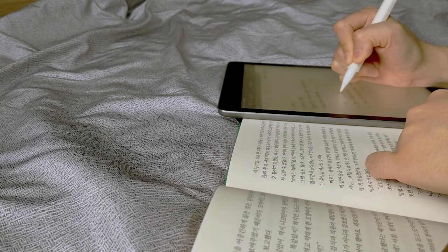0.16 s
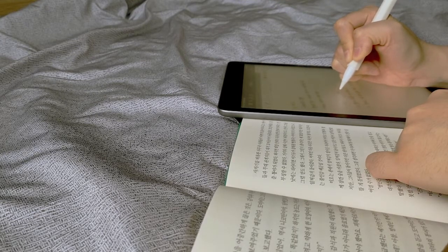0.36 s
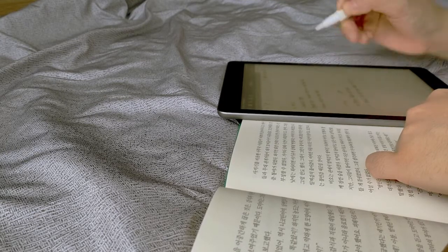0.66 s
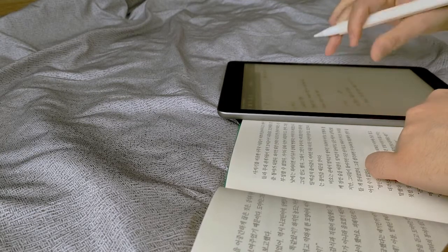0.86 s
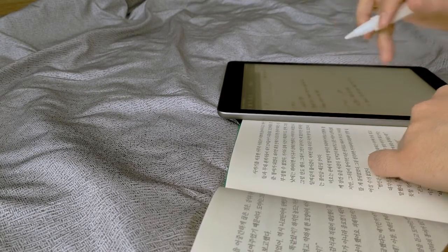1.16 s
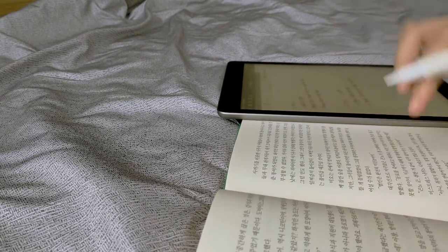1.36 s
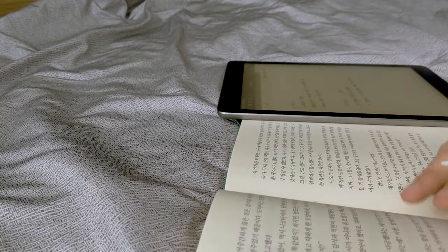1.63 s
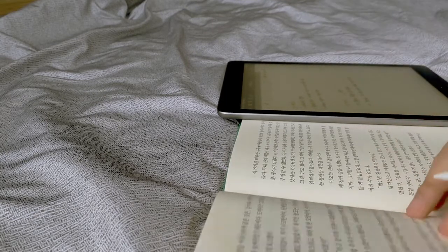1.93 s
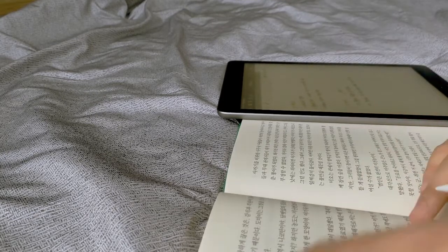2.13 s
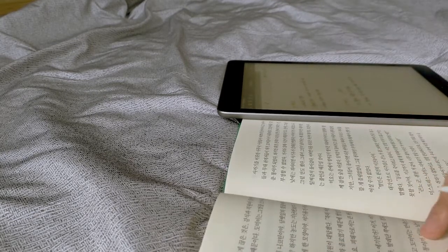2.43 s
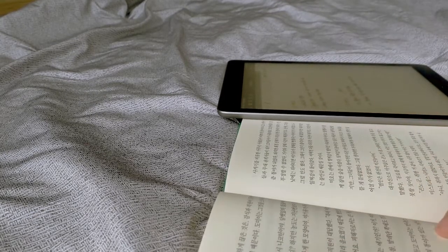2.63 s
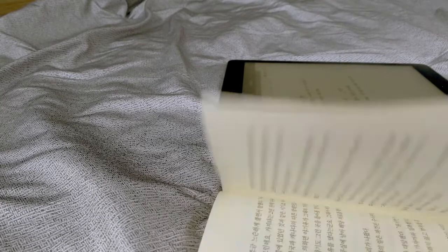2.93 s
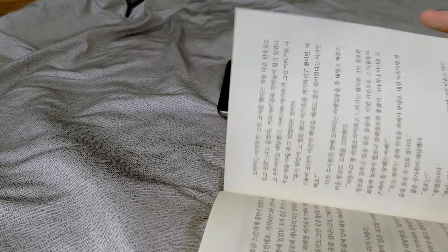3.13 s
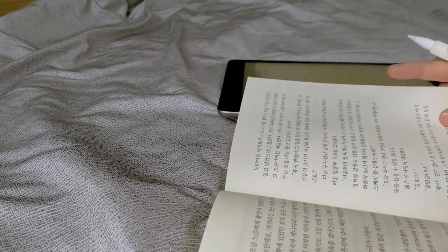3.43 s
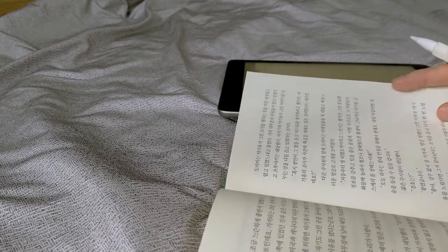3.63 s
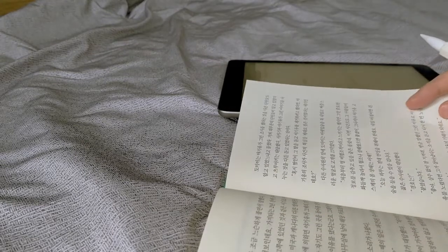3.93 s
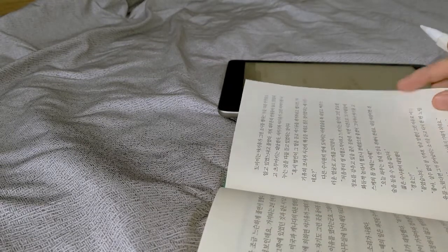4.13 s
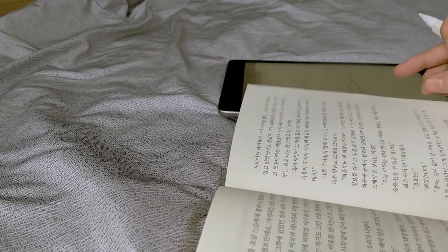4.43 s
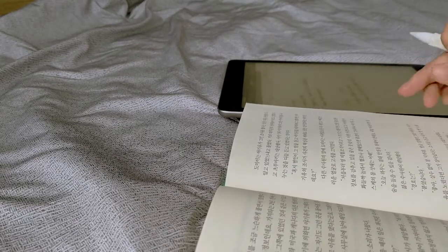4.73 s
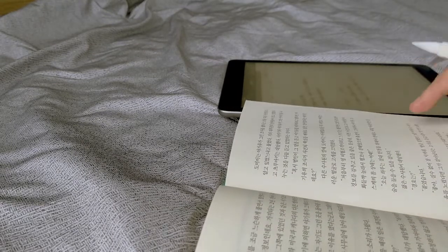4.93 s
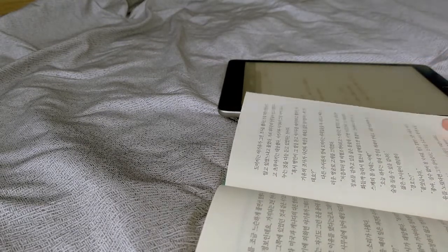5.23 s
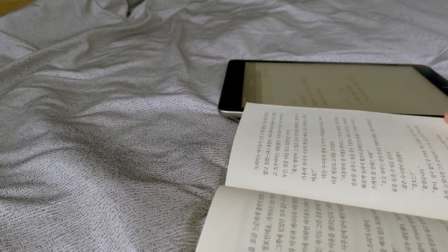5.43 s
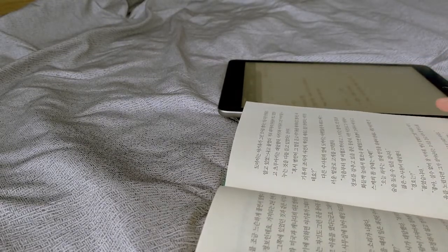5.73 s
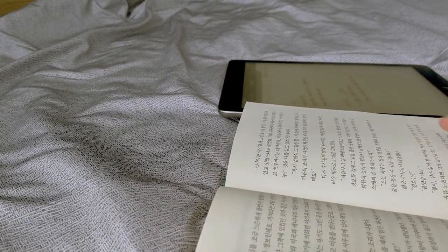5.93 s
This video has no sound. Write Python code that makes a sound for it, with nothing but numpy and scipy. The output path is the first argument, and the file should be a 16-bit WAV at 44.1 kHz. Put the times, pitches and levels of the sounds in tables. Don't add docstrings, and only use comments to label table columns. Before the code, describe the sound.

Three small hard ticks on glass open the scene, the last softer, over faint room hiss. Hands shift on fabric; paper slides quietly, then crinkles and snaps as a sheet is turned, with deep soft thuds through the mattress. A bright snap and a loud slap on glass follow, then dry scrapes, small cracks and gentle stroking. Close phone-like microphone in a small, soft, dry room.

```python
import sys
import numpy as np
from scipy import signal
from scipy.fft import rfft, irfft, next_fast_len
from scipy.io import wavfile
from scipy.ndimage import uniform_filter1d, map_coordinates

SR = 44100
rng = np.random.default_rng(int(sys.argv[2]) if len(sys.argv) > 2 else 0)


def to_wav(sig):
    pcm = np.clip(np.atleast_2d(sig), -1, 1) * 32767
    pcm = np.round(pcm).astype(np.int16)
    wavfile.write(sys.argv[1], SR, pcm.T)


def attenuation_scalar(level_db):
    decades = np.asarray(level_db, float) / 20
    return 10 ** decades


N = 268128


def unit(x):
    return x / np.sqrt(np.mean(x ** 2) + 1e-20)


def along(points, hz):
    f, v = np.transpose(points)
    return np.interp(np.log(hz + 1), np.log(f + 1), v)


def curve(rows):
    s, value = np.transpose(rows)
    return np.interp(np.arange(N) / SR, s, value)


def drift(rate_hz):
    knots = rng.standard_normal(int(N * 200 / SR) + 4)
    return map_coordinates(knots, [np.arange(N) * rate_hz / SR])


def filtered(x, response):
    m = next_fast_len(len(x) + 8192)
    return irfft(rfft(x, m) * response(np.fft.rfftfreq(m, 1 / SR)), m)[:len(x)]


def resonance(f, hz, width_hz):
    return 1j * f * width_hz / (hz * hz - f * f + 1j * f * width_hz)


def dull(f, hz):
    return (hz * hz / (hz * hz - f * f + 1j * f * hz * 1.7)) ** 2


def grainy(spectrum, grain_db, rate_hz, patchy_db):
    z = signal.stft(rng.standard_normal(N + 512), nperseg=512)[2]
    patches = uniform_filter1d(rng.standard_normal(z.shape), size=9, axis=0)
    patches = unit(uniform_filter1d(patches, size=7, axis=1))
    noise = signal.istft(z * attenuation_scalar(patchy_db * patches), nperseg=512)[1][:N]
    noise = noise * attenuation_scalar(grain_db * drift(rate_hz))
    return unit(filtered(noise, lambda f: attenuation_scalar(along(spectrum, f))))


def swells(rest_db, rows):
    ms = np.arange(0, N * 1000 / SR + 1)
    power = 0
    for s, db, rise_ms, fall_ms in rows:
        away = np.maximum((1000 * s - ms) / rise_ms, (ms - 1000 * s) / fall_ms)
        power = power + attenuation_scalar(db - 10 * away) ** 2
    return np.sqrt(attenuation_scalar(rest_db) ** 2 + np.interp(np.arange(N) * 1000 / SR, ms, power))


def crack(t, hz, ms):
    return np.sign(ms) * np.exp(-1.2 * np.abs(t * 1000 / ms) ** 1.25) * np.cos(2 * np.pi * hz * t)


def add(track, s, sound):
    track[round(s * SR):][:len(sound)] += sound


# start_s, tick_db, push_db, ring_db
TAPS = [
    (0.2355, -26.5, -8, -7),
    (0.493, -28.5, -6.5, -6.5),
    (0.826, -34, -6.5, -5),
]
# after_landing_ms, level_db, pitch_hz, half_length_ms (negative: swings away)
CONTACTS = [
    (.6, -6, 3300, .3),
    (1.47, -4, 2900, -.3),
    (1.45, -8, 1300, -.4),
    (1.95, -11, 3400, .45),
]
# pitch_hz, level_db, t60_s
GLASS = [(274, 6.5, 0.013), (710, 0.5, 0.026), (1466, -14, 0.1), (1600, -31, 0.06), (1050, -12, 0.018),
         (2430, -20, .04), (3100, -24, .03)]


def stylus():
    out, t = np.zeros(N + SR), np.arange(SR // 8) / SR
    for s, db, push_db, ring_db in TAPS:
        chatter = rng.standard_normal(len(t)) * (t < 0.0024)
        tick = attenuation_scalar(-12) * filtered(chatter, lambda f: resonance(f, 3250, 1500) * dull(f, 4800))
        for after_ms, level_db, hz, ms in CONTACTS:
            tick = tick + attenuation_scalar(level_db) * crack(t - after_ms / 1000, hz, ms)
        tick = attenuation_scalar(db) * tick
        rebound = filtered(tick, lambda f: resonance(f, 2000, 1600) * dull(f, 3600))
        add(out, s, tick)
        add(out, s + 0.0085, attenuation_scalar(-7) * rebound)
        onset = 1 - np.exp(-(t / 0.00062) ** 2)
        modes = [attenuation_scalar(level_db - 60 * t / t60_s) * onset * np.sin(2 * np.pi * hz * t)
                 for hz, level_db, t60_s in GLASS]
        add(out, s + 0.00242, attenuation_scalar(db + push_db + 9.5) * modes[0])
        add(out, s + 0.0029, attenuation_scalar(db + ring_db) * sum(modes[1:]))
    return out[:N]


# start_s, level_db, click_hz, thud_db, thud_hz
SLAP = [
    (3.7102, -2, 1800, -16.5, 85.5),
]


def slap():
    out, t = np.zeros(N + SR), np.arange(SR // 4) / SR
    for s, db, click_hz, thud_db, thud_hz in SLAP:
        u = (t - 0.0006) * click_hz * np.pi
        click = -(1 - 2 * u * u) * np.exp(-u * u)
        push = attenuation_scalar(3.5 - 60 * t / 0.0047) * np.sin(2 * np.pi * 550 * (t - 0.0008)) * (t > 0.0008)
        noise = filtered(rng.standard_normal(len(t)), lambda f: resonance(f, 1500, 2300) ** 2)
        rattle = attenuation_scalar(-13.5 - 60 * t / 0.018) * (t > 0.001) * unit(noise)
        add(out, s, attenuation_scalar(db) * (click + push + rattle))
        add(out, s + 0.00427, attenuation_scalar(thud_db - 60 * t / 0.097) * np.sin(2 * np.pi * thud_hz * t))
    return out[:N]


# start_s, level_db, first_hz, last_hz, length_ms
FLICK = [
    (3.5592, -19, 2600, 4300, 3.5),
]


def flick():
    out, t = np.zeros(N + SR), np.arange(SR // 50) / SR
    rasp = lambda f: resonance(f, 6200, 1900) ** 2 + resonance(f, 1400, 900)
    for s, db, first_hz, last_hz, ms in FLICK:
        u = t * 1000 / ms
        turns = np.cumsum(first_hz + (last_hz - first_hz) * np.minimum(u, 1) ** 0.66) / SR
        grit = attenuation_scalar(3) * filtered(rng.standard_normal(len(t)), rasp)
        add(out, s, attenuation_scalar(db) * u ** 0.8 * np.exp(-u ** 9) * (np.sin(2 * np.pi * turns) + grit))
    return out[:N]


# middle_s, peak_db, pitch_hz, half_length_ms (negative: the sheet snaps away)
CRACKS = [(1.9935, -38, 9000, .06), (2.025, -46, 13500, .5), (2.0378, -38, 4200, .2), (2.46, -44, 3500, .4),
          (2.7185, -31, 2950, 1.5), (2.773, -38, 2200, 1.5), (3.2245, -26, 3950, .6),
          (3.5607, -10, 3100, .7), (3.5622, -5.5, 4250, .8), (3.5625, -22, 1350, 1.5),
          (3.5662, -23, 1350, 1.3), (3.5712, -25, 3400, 1), (3.7505, -22, 2200, -1.2),
          (3.7557, -20, 1700, -.8), (3.7685, -23, 4100, 1.2), (3.8073, -19, 2100, -.6),
          (3.8081, -22, 4000, .2), (3.8091, -11.5, 2500, .5), (3.8107, -15, 2700, -.4),
          (3.8122, -21, 3100, .6), (3.8117, -15, 1700, -.4), (3.8137, -17, 2200, .4),
          (3.8149, -21, 2300, -.4), (3.8165, -22, 1500, .8), (3.8395, -30, 2100, 1),
          (3.9155, -33, 1700, 1.2), (3.9195, -33, 3000, 1.2), (4.0914, -25, 1850, -.9),
          (4.0925, -35, 3250, 1.2), (4.0952, -28, 1250, 1), (4.0978, -30, 1500, -.6),
          (4.1022, -32, 1950, -.8), (4.1048, -28, 1050, .9), (4.1182, -31, 1600, -.8),
          (4.1195, -38, 3400, .8), (4.1218, -28, 1350, -1.2), (4.123, -33, 2000, -.7),
          (4.4855, -24, 2200, .4), (4.4878, -24, 2800, .4)]
# middle_s, peak_db, pitch_hz, half_length_ms (sign as above)
KNOCKS = [(2.7325, -31, 420, -1.5), (2.7465, -33, 330, 2), (2.7655, -34, 330, 2), (3.158, -33, 600, 1),
          (3.184, -34, 500, 1), (3.2262, -24, 480, 1.1), (3.577, -27, 330, 1.5), (3.5802, -26, 380, 1.2),
          (3.5828, -23, 150, -2.5), (3.8417, -29, 250, -2), (3.8838, -31, 400, -1.2),
          (4.0938, -31, 330, -2), (4.0985, -35, 200, -2.5), (4.103, -35, 300, -1.5),
          (4.1297, -36, 300, 1.5), (5.011, -36, 700, 1.2), (5.6295, -42, 1150, 3), (5.619, -31, 190, 2),
          (5.6505, -30, 270, 2), (5.658, -35, 300, -1.5), (5.666, -35, 300, -1.5), (5.6797, -34, 310, 2),
          (5.6815, -35, 150, -2.5), (5.69, -37, 350, -1.5)]


def creases():
    out, t = np.zeros(N + SR), np.arange(SR // 50) / SR
    for s, db, hz, ms in CRACKS + KNOCKS:
        add(out, s - 0.01, attenuation_scalar(db) * crack(t - 0.01, hz, ms))
    return out[:N]


# freq_hz, level_db_per_hz
FIZZ = [(1500, 2.5), (4000, 1.5), (6500, 0.5), (9000, 2.5), (15500, -2)]


def paper(rows, rise, sharpness, grit_db, fizz_db):
    out, t = np.zeros(N + SR), np.arange(SR // 6) / SR
    for s, db, hz, ms, flap_db in rows:
        width_hz = hz / sharpness
        sheet = lambda f: (resonance(f, hz, width_hz) * resonance(f, hz, 2 * width_hz)
                           * dull(f, max(4800, 1.54 * hz)))
        u = t * 1000 / ms
        body, fizz, flap, grit = rng.standard_normal((4, len(t)))
        shape = np.clip(u / rise, 0, 1) * np.exp(-u ** 4)
        shape = shape * attenuation_scalar(grit_db * unit(uniform_filter1d(grit, size=90)))
        size = np.sqrt(np.mean(shape ** 2))
        body = unit(filtered(shape * body, sheet))
        fizz = unit(filtered(shape * fizz, lambda f: attenuation_scalar(along(FIZZ, f))))
        flap = unit(filtered(shape * flap, lambda f: resonance(f, 300, 910) ** 2))
        burst = body + attenuation_scalar(fizz_db) * fizz + attenuation_scalar(flap_db) * flap
        add(out, s - 0.0005, attenuation_scalar(db - 9.5) * size * burst)
    return out[:N]


# start_s, level_db, pitch_hz, length_ms, flap_db
SNAPS = [(2.457, -42, 1800, 6, -9), (2.685, -28.5, 2280, 3.4, -1), (2.718, -29, 3300, 5.3, -6),
         (2.769, -34, 2300, 9, 3), (2.807, -26, 2300, 2.7, -3), (2.8178, -28.5, 2290, 3.7, -6),
         (2.934, -28.5, 2500, 3.1, -2), (3.2237, -19.5, 2600, 2, -12), (4.4838, -21.5, 1900, 6.5, -9),
         (5.545, -40, 10000, 3.8, -30), (5.6165, -38, 7000, 3.2, -10), (5.6215, -32, 9000, 3.1, -6)]
# start_s, level_db, pitch_hz, length_ms, flap_db
SCUFFS = [(2.56, -35.5, 2100, 42, -16), (2.716, -30, 2800, 25, -7), (2.937, -32, 4200, 16, -20),
          (3.155, -48.5, 1970, 50, 13.5), (3.23, -50, 2538, 26, 6), (3.505, -28, 3740, 83, -34),
          (3.755, -23.5, 3180, 33, -2), (4.444, -45, 2000, 15, 11), (4.483, -33, 3100, 36, 7),
          (5.98, -34, 3150, 60, -4.5)]


def free_sheet():
    snaps = paper(SNAPS, rise=0.17, sharpness=0.95, grit_db=2.0, fizz_db=0.5)
    return snaps + paper(SCUFFS, rise=0.12, sharpness=1.5, grit_db=0.5, fizz_db=-6)


# start_s, level_db, pitch_hz, length_ms, flap_db
POPS = [(3.5605, -26, 2100, 7.5, -25), (3.5635, -25, 4200, 3.9, -25), (3.5705, -25, 3600, 3.5, -25),
        (3.8068, -24, 2000, 11, -31), (3.8105, -36, 3200, 4, -32), (3.839, -35, 1940, 8.1, -6),
        (4.0902, -34, 1790, 4, -5), (4.0905, -38, 3250, 6, -20), (4.1165, -33, 1660, 9, -4)]
# start_s, level_db, pitch_hz, length_ms, flap_db
DRAGS = [(3.575, -38, 3960, 69, -16), (3.62, -28.5, 3440, 66, -28), (3.714, -27.5, 2130, 89, -7),
         (3.749, -21, 1670, 15.5, -6.5), (3.815, -25, 1920, 11, -11.5), (3.905, -34, 1630, 30, -8),
         (4.011, -41, 1210, 58, -10.5), (4.093, -29, 1330, 13, -6.5), (4.106, -28, 1200, 22, -19),
         (4.126, -40, 1340, 60, -10), (4.51, -33, 1110, 77, -2), (5.2, -42, 1090, 66, -20),
         (5.27, -43, 1200, 100, -17), (5.607, -40, 13100, 9, -25), (5.621, -29.5, 15200, 23, -25),
         (5.665, -38, 14500, 59, -25)]


def sheet_on_glass():
    pops = paper(POPS, rise=0.094, sharpness=2.1, grit_db=7.5, fizz_db=-24)
    return pops + paper(DRAGS, rise=0.063, sharpness=1.85, grit_db=1.0, fizz_db=-28)


SQUEAK_HZ = 6720
# start_s, level_db, length_ms
SQUEAKS = [
    (3.625, -46, 59),
    (3.715, -38, 23),
    (3.742, -31, 6),
    (3.755, -33.5, 34),
    (3.83, -44, 37),
]


def squeaks():
    rows = [(s, db, SQUEAK_HZ, ms, -30) for s, db, ms in SQUEAKS]
    return paper(rows, rise=0.18, sharpness=13, grit_db=5.0, fizz_db=-30)


# time_s, level_db
SMOOTHING = [(4.29, -51), (4.47, -45.5), (4.545, -39.5), (4.6, -48), (4.65, -43), (4.836, -40), (4.93, -34),
             (4.96, -39), (5.09, -39), (5.16, -44)]
# pitch_hz, width_hz, level_db
POCKET = [(2010, 600, -1), (3010, 530, 3), (4200, 490, -13), (6400, 840, -11)]
TOUCH_S, LIFT_S = 0.017, 0.18


def smoothing():
    before = [(SMOOTHING[0][0] - TOUCH_S, -90)]
    after = [(SMOOTHING[-1][0] + LIFT_S, -90)]
    level_db = curve(before + SMOOTHING + after)
    friction = rng.standard_normal(N) * attenuation_scalar(0.78 * drift(110))
    modes = lambda f: sum(attenuation_scalar(db) * resonance(f, hz, width_hz) for hz, width_hz, db in POCKET)
    return attenuation_scalar(level_db) * unit(filtered(friction, lambda f: modes(f) * resonance(f, 2000, 4600)))


# time_s, level_db
RUSTLE = [(0, -62.5), (0.45, -60.5), (1.1, -63.5), (1.85, -63), (2.5, -66), (3.3, -57), (3.46, -56.5),
          (4.0, -68), (4.25, -53.5), (4.75, -50.5), (5.39, -51), (5.44, -56), (5.75, -52), (6.08, -47.5)]
# peak_s, level_db, rise_ms_per_10db, fall_ms_per_10db
ARMS = [(1.26, -58.5, 50, 597), (1.57, -57, 400, 200), (1.99, -48, 148, 698), (2.22, -64, 400, 400),
        (2.72, -48, 44, 200), (2.952, -45.5, 30, 48), (3.12, -53, 298, 300), (3.232, -47.5, 200, 30),
        (3.526, -50, 70, 40), (3.642, -49, 40, 100), (3.766, -47, 200, 70), (3.882, -47, 50, 97),
        (4.066, -49.5, 126, 75), (4.296, -47, 25, 17), (4.398, -44.5, 12, 15), (4.444, -37, 3, 150),
        (4.542, -44, 150, 150), (4.67, -50, 200, 45), (5.024, -50, 200, 60), (5.11, -48.5, 90, 109),
        (5.212, -53.5, 80, 500), (5.598, -54, 300, 604), (5.992, -46, 67, 118)]
# peak_s, level_db, rise_ms_per_10db, fall_ms_per_10db, fizz_over_it_db
SLIDES = [(1.25, -59.5, 29, 600, -2), (1.53, -57.5, 391, 200, -10), (2.0, -48.5, 53, 300, -16),
          (2.22, -49, 206, 392.5, 1.3), (2.58, -45.5, 75, 130, -10), (2.72, -47.5, 39, 159, 3),
          (2.952, -52, 35, 52, 8), (3.12, -50, 200, 300, 2.3), (3.232, -47.5, 200, 37, 2.5),
          (3.526, -44.5, 54, 40, 1), (3.66, -43.5, 92, 62, -7), (3.766, -34.5, 70, 48, -6.5),
          (3.882, -41.5, 90, 51, -4), (4.151, -59.5, 153, 150, 8.5), (4.32, -57, 80, 150, 3),
          (4.5, -41.5, 48, 31, 8), (4.55, -43, 58, 250, -8), (4.67, -43.5, 44, 63, 2.5),
          (4.92, -52, 131, 119, 16.5), (5.39, -56.5, 202, 42, 7), (5.63, -51.5, 68, 120, -10),
          (5.7, -63, 100, 55, -7), (5.992, -41, 33, 124, -6)]
# freq_hz, level_db_per_hz
BEDDING = [(60, -3), (110, -5), (250, -3.5), (600, -7.5), (1200, -29), (3000, -19.5)]
# freq_hz, level_db_per_hz
SLIDE = [(400, -51), (900, -1.5), (2000, -1.5), (3100, -2.5), (4500, -1), (5200, -10.5), (6600, -7),
         (9000, -14.5)]
REST_BEDDING_DB, REST_FIZZ_DB = -6.5, -9


def rustle():
    rest_db = curve(RUSTLE)
    pressure_db = 0.7 * drift(16)
    fizz_rows = [(s, db + fizz_db, rise, fall) for s, db, rise, fall, fizz_db in SLIDES]
    bedding = swells(rest_db + REST_BEDDING_DB, ARMS) * attenuation_scalar(pressure_db)
    slide = swells(rest_db, [row[:4] for row in SLIDES]) * attenuation_scalar(pressure_db)
    fizz = swells(rest_db + REST_FIZZ_DB, fizz_rows) * attenuation_scalar(pressure_db / 3)
    bedding = bedding * grainy(BEDDING, grain_db=2, rate_hz=60, patchy_db=3.0)
    slide = slide * grainy(SLIDE, grain_db=0.5, rate_hz=200, patchy_db=2.5)
    return bedding + slide + fizz * grainy(FIZZ, grain_db=-1.5, rate_hz=200, patchy_db=0.0)


# start_s, level_db, pitch_hz, length_ms
BUMPS = [(2.451, -42, 197, 26), (2.697, -29, 95, 91), (2.723, -31, 257, 26), (2.939, -42, 149, 19),
         (3.22, -38, 313, 13), (3.5753, -36, 220, 12), (3.77, -35, 194, 94), (4.029, -39.5, 200, 25),
         (4.447, -35, 113, 90), (4.49, -42, 246, 91), (4.53, -37, 437, 45), (5.615, -43, 166, 39),
         (5.644, -44, 328, 29), (5.672, -44, 400, 13)]


def bumps():
    out, t = np.zeros(N + SR), np.arange(SR // 4) / SR
    for s, db, hz, ms in BUMPS:
        u = t * 1000 / ms
        puff = unit(filtered(rng.standard_normal(len(t)), lambda f: resonance(f, hz, 0.62 * hz) ** 2))
        add(out, s, attenuation_scalar(db) * np.clip(u / 0.4, 0, 1) * np.exp(-1.5 * u * u) * puff)
    return out[:N]


# time_s, level_db
WOBBLE = [(0, -45), (1.9, -46.5), (2.15, -43), (2.66, -49), (2.9, -50), (3.1, -40.5), (3.36, -53),
          (4.2, -68), (4.7, -41.5), (5.17, -48), (5.4, -55), (5.55, -41), (6.08, -47.5)]
# peak_s, level_db, ms_per_10db (each side)
NUDGES = [(0.03, -45, 37), (0.17, -34, 51), (0.3, -32, 19), (0.56, -33.5, 40), (0.82, -44, 68),
          (1.01, -43, 47), (1.12, -36.5, 38), (1.2, -39, 23), (1.3, -38.5, 23), (1.49, -42, 117),
          (1.69, -39.5, 78), (1.81, -41.5, 90), (2.49, -35.5, 90), (2.78, -24.5, 49), (2.96, -25, 13),
          (3.18, -37.5, 50), (3.3, -37.5, 39), (3.84, -33.5, 75), (4.05, -42.5, 33), (4.15, -45, 26),
          (4.27, -48, 29), (4.54, -37.5, 104), (5.25, -39, 31), (5.42, -39.5, 38), (6.08, -38, 25)]
# start_s, level_db, pitch_hz, t60_s
THUMPS = [
    (0.268, -24.5, 45.8, 0.33),
    (0.536, -41, 50, 0.082),
    (2.751, -14.5, 41.3, 0.48),
    (2.94, -18, 44.3, 0.12),
    (3.576, -16, 77, 0.07),
    (3.587, -15, 48, 0.11),
]


def wobble():
    mode = resonance(np.fft.rfftfreq(N, 1 / SR), 50.3, 25.0) ** 2
    swing = np.fft.ifft(rfft(rng.standard_normal(N)) * mode, N)
    steady = swing.real / np.abs(swing) ** 0.33
    out, t = np.zeros(N + SR), np.arange(SR // 2) / SR
    for s, db, hz, t60_s in THUMPS:
        envelope = attenuation_scalar(db - 4 - 60 * t / t60_s) * (1 - np.exp(-t / 0.0039))
        add(out, s, envelope * np.sin(2 * np.pi * hz * t))
    shaken = swells(curve(WOBBLE), [(s, db, ms, ms) for s, db, ms in NUDGES])
    return np.minimum(shaken, attenuation_scalar(-32.5)) * unit(steady) + out[:N]


# start_s, end_s, pitch_hz, level_db
FAR_TONE = [
    (0.99, 1.198, 573, -60.5),
]


def outside():
    t = np.arange(N) / SR
    out = np.zeros(N)
    for start_s, end_s, hz, db in FAR_TONE:
        fade = np.clip(np.minimum(t - start_s, end_s - t) / 0.021, 0, 1)
        out += attenuation_scalar(db) * fade * np.sin(2 * np.pi * hz * t)
    return out


# freq_hz, level_db_per_hz
HISS = [(53, -4.5), (90, -7), (151, -13.5), (214, -13), (467, -20), (1090, -22.5), (1680, -27),
        (3430, -29.5), (11800, -36.5), (16000, -84)]
HISS_DB = -51.5


def hiss():
    return attenuation_scalar(HISS_DB) * grainy(HISS, grain_db=-1.76, rate_hz=52, patchy_db=-1.2)


# freq_hz, t60_s
ROOM = [(200, 0.33), (2000, 0.075), (10000, 0.068)]


def room(x):
    hz, t, z = signal.stft(rng.standard_normal(SR // 3), SR, nperseg=256)
    decay = attenuation_scalar(-60 * t / along(ROOM, hz)[:, None])
    tail = signal.istft(z * decay, SR, nperseg=256)[1]
    return signal.fftconvolve(np.pad(x, (300, 0)), tail / np.linalg.norm(tail))[:N]


def scene():
    hits = stylus() + slap() + flick() + creases() + free_sheet() + sheet_on_glass() + squeaks()
    moves = smoothing() + rustle() + bumps() + wobble()
    return (hits + attenuation_scalar(-15.0) * room(hits) + moves + outside() + hiss())[None]


def low_pass(x):
    return signal.sosfilt(signal.butter(12, 16480, fs=SR, output="sos"), x)


# freq_hz, width_hz, depth (0-1)
DIPS = [(4990, 370, 0.42), (7700, 2000, 0.29), (10440, 370, 0.9)]
TOP_HZ = 15850


def record(dry):
    def port(f):
        notches = [1 - depth * resonance(f, hz, width_hz) for hz, width_hz, depth in DIPS]
        return np.prod(notches, axis=0) * (f < TOP_HZ)
    mix = filtered(dry[0], port)[None]
    return low_pass(mix)


dry = scene()
out = record(dry)
to_wav(out)
```